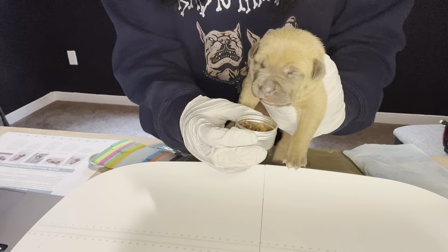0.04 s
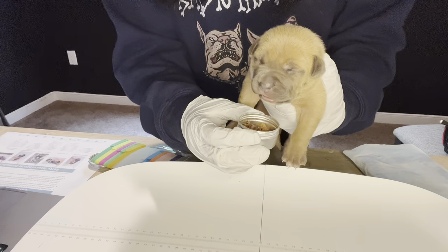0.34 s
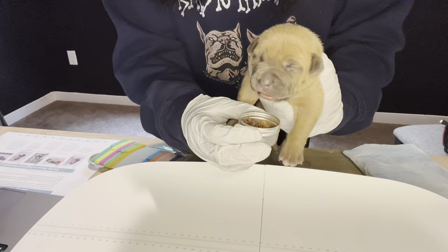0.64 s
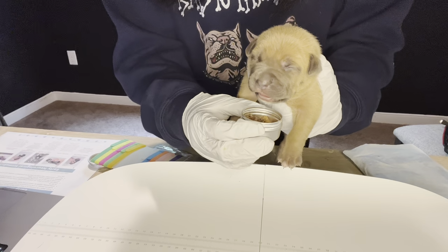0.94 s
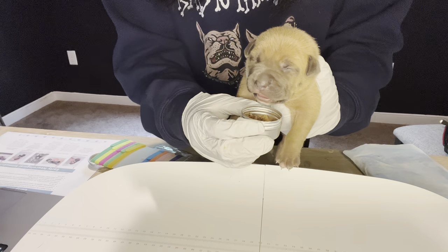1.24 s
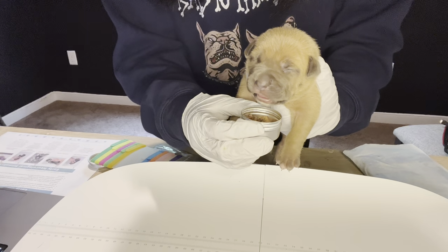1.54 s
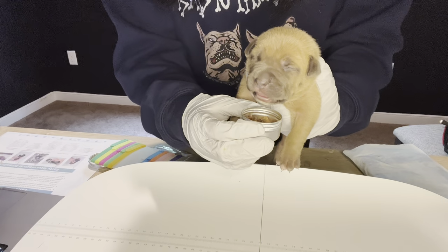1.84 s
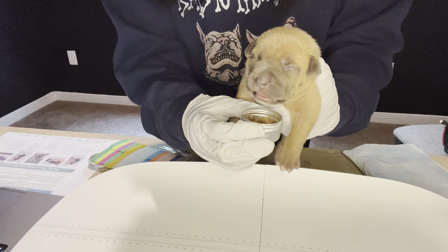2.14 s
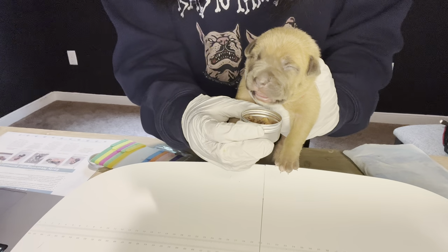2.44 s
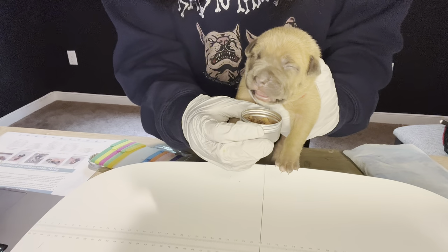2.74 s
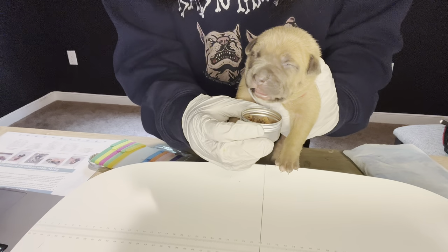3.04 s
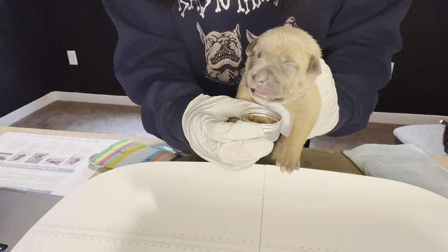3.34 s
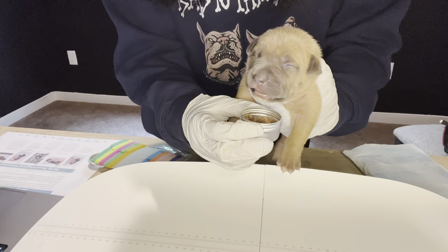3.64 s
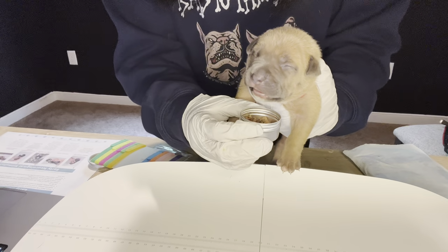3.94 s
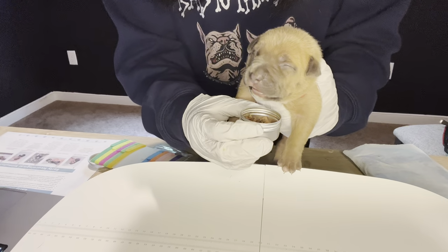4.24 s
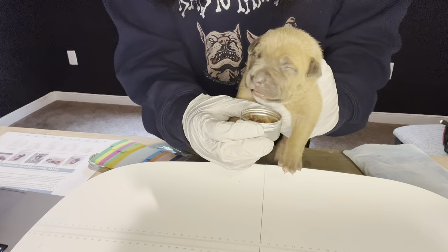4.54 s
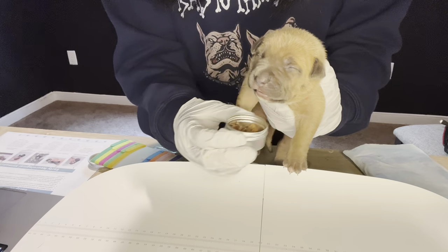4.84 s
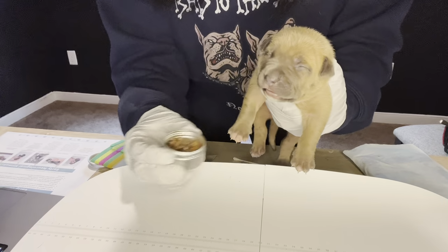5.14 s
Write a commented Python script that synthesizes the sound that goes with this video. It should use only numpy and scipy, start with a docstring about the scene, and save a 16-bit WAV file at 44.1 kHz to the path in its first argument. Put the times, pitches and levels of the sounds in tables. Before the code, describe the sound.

A very young puppy cries over and over in short bursts, its thin, high squeals breaking into rasps, hoarse falling whines and low grunts. From a little before halfway, hands and paws softly bump and scuff a hollow tub. Sleeves and gloves rustle faintly throughout. The small, slightly echoing room is heard in stereo, with the puppy a little to the right.

```python
"""A small live room, heard on a stereo microphone with hard surfaces near by. A very young puppy, held over a
tub a little to the right, cries over and over. Its vocal folds lock into thin squeals, then break down into
rasps, hoarse falling whines and low grunts, each coloured by throat and muzzle. A second pup grunts softly
beneath two of the squeals. Hands and paws bump and scuff the hollow tub, ringing its walls and its hollow.
Sleeves and gloves rustle throughout, over quiet room tone."""
import sys
import numpy as np
from scipy import signal
from scipy.fft import rfft, irfft
from scipy.io import wavfile
from scipy.ndimage import map_coordinates

SR = 44100
rng = np.random.default_rng(int(sys.argv[2]) if len(sys.argv) > 2 else 0)


def dump(signal):
    """Clip the signal to [-1, 1] and save it as 16-bit WAV at the path in sys.argv[1]."""
    limited = np.clip(np.atleast_2d(signal).T, -1, 1)
    pcm = np.round(limited * 32767).astype(np.int16)
    wavfile.write(sys.argv[1], SR, pcm)


N = 228066

# Noise spectra of room tone, cloth, breath forced through the throat, slaps and scuffs: hz, density_db
ROOM_TONE_SPECTRUM = [(25, -18.5), (70, -0.5), (110, -11.5), (170, -8.5), (400, -1.5), (1300, -1.5),
                      (2500, -13), (5000, -21.5), (9000, -33), (14000, -37)]
CLOTH_SPECTRUM = [(25, -3.5), (70, 7), (105, 3), (150, 2), (210, -1), (300, 0.5), (600, -4.5), (1200, 3.5),
                  (2500, -22.5), (5000, -26.5), (9000, -37.5), (14000, -38)]
BREATH_SPECTRUM = [(200, -1), (450, 2.5), (800, 10.5), (1300, 11), (2100, 1.5), (3600, -28), (4500, -49.5),
                   (6500, -7), (8500, -26), (10000, -8), (12500, -15), (15000, -38)]
SLAP_SPECTRUM = [(60, -2), (250, 3.5), (600, 4.5), (1200, -13), (2500, -20), (4500, -21.5), (8000, -31.5),
                 (14000, -33)]
SCUFF_SPECTRUM = [(80, -6), (300, -6), (550, 6.5), (1100, 4), (2000, -8), (3200, -11), (4500, -13),
                  (7000, -18.5), (9500, -20), (13000, -21), (15500, -55)]
# Cloth rubbing as the hands shift: time_s, level_db
CLOTH_LEVELS = [(0, -55.5), (.45, -62.5), (1, -60), (1.45, -61.5), (1.8, -69), (2.15, -49), (2.55, -55),
                (3, -54), (3.4, -52.5), (3.7, -53.5), (4, -51.5), (4.5, -50.5), (4.85, -52.5),
                (5.17, -54.5)]

# In the cries, level_db is the fundamental; second_db (second harmonic) and over_db (all above it) are
# relative to it. A share is a fraction of the cry's length. Roughness runs from 0, clean, to 1, hoarse.
# Thin high cries: start_s, length_s, crest_share, start_hz, crest_hz, end_hz, widest_share, open_s,
# level_db, swell_db, second_db, over_db, onset_roughness
SQUEALS = [ (0.009, 0.045, 0.1, 1530, 1530, 1520, 0.1, 0.2, -47, -14, -8, -8, 0.02),
           (0.084, 0.075, 0.74, 1425, 1526, 1450, 0.3, 0.085, -38.5, 6, -19.5, -30, 0.43),
           (0.498, 0.147, 0.63, 1225, 1530, 1495, 0.68, 0.072, -29.7, 3, -8.5, -8, 0.15),
           (0.736, 0.052, 0.25, 1510, 1530, 1480, 0.1, 0.08, -28, -3, -29, -39, 0.1),
           (2.254, 0.18, 0.522, 1486, 1662, 1564, 0.43, 0.13, -23.8, 0, -4, -7, 0.15),
           (2.604, 0.262, 0.52, 1180, 1640, 1510, 0.18, 0.085, -23.3, 9, -2, -0.5, 0.65), ]
NASAL_SQUEALS = [ (1.872, 0.145, 0.5, 1450, 1600, 1530, 0.4, 0.085, -30.3, -7, -22, -19, 0.25),
                 (3.455, 0.062, 0.9, 1280, 1430, 1420, 0.7, 0.08, -40, 3, -15, -11, 0.45),
                 (4.843, 0.075, 0.92, 1230, 1440, 1430, 0.7, 0.08, -34, 4, -17, -15, 0.2), ]  # muzzle nearly shut
# Creaky onsets at half pitch: start_s, length_s, start_hz, end_hz, overtone_level_db
CREAKS = [(0.082, 0.062, 641, 761, -46), (0.486, 0.05, 691, 679, -46), (1.056, 0.041, 617, 690, -43),
          (1.09, 0.035, 765, 780, -35.5), (2.593, 0.021, 676, 686, -39), (3.435, 0.054, 634, 640.4, -43.5),
          (4.837, 0.057, 675, 722, -48.5)]
# Low grunts, mostly rising; those at 2.269 s and 2.721 s come from a second pup: start_s, length_s, start_hz,
# end_hz, bow_hz, level_db, second_db, over_db, roughness
GRUNTS = [ (0.14, 0.075, 290, 500, 0, -42.5, 0, 0, 0.3), (0.651, 0.075, 501.6, 898, 0, -41, 0, -6.5, 0.8),
          (0.715, 0.1, 330, 458.8, 0, -43, 6, 3, 0.45), (1.174, 0.11, 759, 691.3, 0, -39, 0.5, -1.5, 0.37),
          (1.301, 0.125, 530, 590, 35, -54, 12.5, 8.5, 0.28),
          (2.269, 0.13, 310, 540, -35, -50, 4, -3, 0.62), (2.721, 0.1, 400, 542, 0, -49, 6, -9, 0.66),
          (3.045, 0.07, 270, 350, 0, -52, -3, 7, 0.6), (3.104, 0.17, 500, 515, 12, -44.5, -2, -0.5, 0.2),
          (3.826, 0.102, 445, 462, 32, -41.5, 5.5, -4.5, 0.28), ]
# Hoarse cries that crest and break downwards: start_s, length_s, crest_share, start_hz, crest_hz, end_hz,
# plunge (1 is an even fall, more is sudden), push_share, level_db, swell_db, second_db, over_db,
# start_roughness, end_roughness
WHINES = [ (0.169, 0.13, 0.031, 1403, 1390, 769.5, 1.75, 0.71, -36.3, 9, -1.5, -18.5, 0.7, 0.36),
          (1.5, 0.12, 0.39, 1110, 1098, 828, 1.37, 0.82, -34.5, 5, -5, -18.5, 0.55, 0.1),
          (2.024, 0.037, 0.95, 1020, 1149, 1160, 1.1, 0.47, -36.5, 1, -21, -29, 0.4, 0.1),
          (2.221, 0.053, 0.9, 1125, 1195, 1205, 1.1, 0.65, -43, 6, 8.5, -15, 1.05, 0.8),
          (2.842, 0.034, 0.2, 1140, 1145, 1125, 1.1, 0.44, -35.5, 3, -11, -30, 0.17, 0.25),
          (3.025, 0.14, 0.15, 1250, 1268, 749, 0.89, 0.98, -37, 8, -9, -16, 1, 0.3),
          (3.505, 0.072, 0.08, 1290, 1270, 820, 1.2, 0.82, -32, 8, 4, -23, 0.55, 0.27),
          (3.601, 0.043, 0.2, 890, 888, 865, 1.2, 0.74, -36.5, 7, 2, -31, 0.66, 0.72),
          (4.135, 0.092, 0.6, 860, 1340, 1200, 1.03, 0.55, -30.5, 8, -1, -24, 0.4, 0.95),
          (4.906, 0.078, 0.03, 1190, 1170, 840, 2.2, 0.45, -28.8, 4, -2, -18, 0.3, 0.38), ]
SPLIT_SQUEAL = (1.098, 0.08, 0.2, 772, 766, 748, 1, 0.68, -45.5, 7, 29, 15.5, 0.24, 0.11)  # strong and weak pulses alternate, adding lines between harmonics
WHIMPER = (1.688, 0.245, 0.42, 719, 745.5, 695.5, 1, 0.6, -39, 5.5, 11, -1, 0.16, 0.04)  # soft and nasal
YELP = (4.222, 0.04, 0.2, 1190, 1180, 1075, 1.1, 0.42, -19.7, 11, 1, -15, 0.2, 0.34)  # a short sharp bark
# Breaks in the voice: start_s, length_s, level_db, resonance_hz, width_hz
RASPS = [(0.632, 0.055, -36, 2040, 330), (1.156, 0.047, -30, 2330, 850), (2.392, 0.033, -36, 2360, 380),
         (2.594, 0.037, -40, 1700, 1300), (3.549, 0.026, -37, 1810, 450), (3.787, 0.055, -43, 1140, 190),
         (4.156, 0.05, -39, 1700, 600), (4.239, 0.009, -27, 2020, 300), (4.904, 0.03, -38, 2200, 450)]
# The throat's colour in each register, from the third harmonic up: hz, gain_db
SQUEAL_THROAT = [(3700, 10), (4500, 6.5), (5100, 3.5), (6200, -0.5), (7200, -8), (7950, -3.5), (8500, -16),
                 (9400, -22), (10200, -20.5), (11500, -17.5), (13300, -26), (14500, -46)]
GRUNT_THROAT = [(900, 23), (1500, 5.5), (2100, 5.5), (2700, -19), (4000, -23), (6500, -14.5), (9000, -50),
                (11000, -24), (14000, -46)]
WHINE_THROAT = [(1200, -3), (2200, 9.5), (2900, -9.5), (3500, -10.5), (4400, -25), (5400, -17),
                (7000, -13.5), (8500, -40), (11000, -25), (14000, -55)]
SPLIT_THROAT = [(2300, -11), (3050, 0), (3800, -26), (4550, -14), (5350, -21), (6050, -15), (6900, -20),
                (7600, -22), (8500, -42), (10500, -31), (13500, -34), (15000, -60)]
WHIMPER_THROAT = [(2100, 9.5), (2900, -9), (3700, -19), (4800, -28), (6300, -8), (7300, -15.5),
                  (8500, -30.5), (10400, -9), (11500, -32), (13000, -32), (15000, -41)]
NASAL_THROAT = [(4200, -13), (4800, -19), (5600, -11), (6400, 0), (7100, 2), (8000, -14), (9000, -22),
                (10500, -10), (13000, -24), (15000, -42)]
YELP_THROAT = [(3200, 0), (3800, -1), (4500, 7), (5050, -3), (5500, 0), (6600, -16), (7900, -13),
               (9000, -31), (10800, -16), (13000, -35)]
# Side cavities of the muzzle: centre_hz, width_hz, gain_db
MUZZLE_BANDS = [(3470, 350, -4.5), (5430, 133, 3.5)]

# Blows on the tub: start_s, level_db, relative_boom_db, relative_slap_db, t60_factor, spot_hz, press_s
BUMPS = [(1.795, -39, -14, -5, 1.6, 200, .005), (1.965, -42, -5, -20, 1.4, 170, .008),
         (2.036, -42, -21, -23, 0.86, 190, .007), (2.103, -36, -17, -20, 1.4, 200, .008),
         (2.421, -24.5, -8, -22, 1, 155, .008), (3.248, -44, -12, -14, 1, 135, .012),
         (3.279, -28.5, 3, -8, 1.35, 160, .006), (3.63, -38, -4, -7, 1.04, 180, .01),
         (3.661, -46, -1.5, 10, 0.6, 400, .005), (4.284, -37, -14, -28, 0.98, 200, .01),
         (4.422, -39, -3, -6, 1.4, 175, .008), (4.564, -32, -11, -0.5, 1.37, 185, .012),
         (4.749, -23, -22, -12, 0.8, 235, .008), (5.092, -25, -26, -8, 1, 205, .015)]
# Modes of the tub's walls: pitch_hz, level_db, t60_s
TUB_MODES = [(149, -2, 0.33), (182, 0, 0.22), (208, -1, 0.24), (287, 0, 0.21), (443, -6, 0.35),
             (511, -5, 0.15), (623, -16, 0.45)]
# Scuffs of glove and paw: start_s, length_s, level_db
SCUFFS = [(3.281, 0.012, -41.5), (3.66, 0.1, -53), (3.724, 0.023, -47), (4.548, 0.011, -29.5),
          (4.552, 0.051, -32.5), (5.006, 0.02, -47)]

# Echoes off the table, the chest and the nearest walls: left_delay_s, right_delay_s, level_db
ECHOES = [(.0021, .0017, -8), (.0047, .0052, -8), (.0083, .0076, -8), (.0118, .0126, -8),
          (.0172, .0163, -9), (.0231, .0243, -10), (.0316, .0302, -12)]
# Decay of the room: hz, t60_s
ROOM_T60 = [(100, 0.21), (500, 0.34), (1500, 0.4), (4500, 0.46), (8000, 0.42), (14000, 0.19)]
# What the surfaces throw back: hz, gain_db
REFLECTED_COLOUR = [(50, -12), (110, -3), (300, -1), (1500, -0.5), (5000, 0), (8000, -2.5), (14000, 2)]
# The voice at the microphone: hz, left_minus_right_db
VOICE_BALANCE = [(400, -2.5), (900, -3.5), (2000, -0.5), (3200, -3), (4500, -4.5), (6500, -3.5),
                 (8500, -1.5), (12000, 2)]


def amp(db):
    return 10 ** (np.asarray(db) / 20)


def unit_rms(x):
    return x / np.sqrt(np.mean(abs(x) ** 2) + 1e-20)


def curve_at(points, hz):
    """A spectrum joined by straight lines on a log-frequency axis."""
    f, value = np.transpose(points)
    return np.interp(np.log(hz + 1), np.log(f + 1), value)


def add(mix, start_s, sound):
    part = mix[round(start_s * SR):][:len(sound)]
    part += sound[:len(part)]


def noise(spectrum, size=N):
    """Coloured noise of rms about 1."""
    colour = amp(curve_at(spectrum, np.fft.rfftfreq(N, 1 / SR)))
    return unit_rms(irfft(rfft(rng.standard_normal(N)) * colour, N))[:size]


def flutter(t, rate):
    """A smooth random wobble with about rate turns a second."""
    return map_coordinates(rng.standard_normal(2048), [(t - t[0]) * rate], order=2, mode="wrap")


def room_tone():
    """Quiet air, partly shared by the two sides of the microphone."""
    shared = noise(ROOM_TONE_SPECTRUM)
    pair = np.array([shared + 1.25 * noise(ROOM_TONE_SPECTRUM) for side in range(2)])
    return amp(-60) * unit_rms(pair)


def rustle():
    """Sleeves and gloves rub, dull and lumpy."""
    t = np.arange(N) / SR
    level_db = np.interp(t, *np.transpose(CLOTH_LEVELS)) + 0.83 * flutter(t, 25)
    return amp(level_db) * noise(CLOTH_SPECTRUM)


def cry(gesture, throat, waver, jitter, rasp, rasp_rate, hiss_db, harmonics):
    """Vocal folds and breath follow a gesture; roughness shakes the pitch and smears each harmonic."""
    times, *columns = np.transpose(gesture)
    fade_s = .008
    t = np.arange(times[0] - fade_s, times[-1] + fade_s, 1 / SR)
    hz, level_db, second_db, over_db, rough = (np.interp(t, times, c) for c in columns)
    hz = hz * (1 + waver * flutter(t, 60.07))  # never held quite steady
    rough = np.clip(rough, 0, 1)
    quiver = flutter(t, 260.3) + 0.67 * np.sin(2 * np.pi * (95 * t + 0.072 * flutter(t, 42.6)))  # strain
    phase = 2 * np.pi * np.cumsum(hz * (1 + jitter * np.tanh(rough / 0.42) * quiver)) / SR
    overtone_hz = np.arange(3, harmonics + 1)[:, None] * hz
    overtones = amp(curve_at(throat, overtone_hz)) * (overtone_hz < SR / 2)
    overtones *= amp(over_db) / np.linalg.norm(overtones, axis=0)
    heights = np.vstack([np.ones(len(t)), amp(second_db), overtones])
    voice = np.zeros(len(t))
    for order, height in enumerate(heights, 1):
        smear = np.clip(rasp * rough * order ** .33, 0, 1)  # high harmonics lose their shape first
        hoarse = (flutter(t, rasp_rate) + 1j * flutter(t, rasp_rate)) / np.sqrt(2)
        voice += height * ((np.sqrt(1 - smear ** 2) + smear * hoarse) * np.exp(1j * order * phase)).real
    effort_db = level_db + 10 * np.log10(np.sum(heights ** 2, axis=0))
    hiss = amp(hiss_db + 0.68 * effort_db) * noise(BREATH_SPECTRUM, len(t))  # grows less than the tone
    hiss *= 1 - np.exp(-(t - t[0]) / 0.026)  # the airflow builds up
    ends = np.clip(np.minimum(t - t[0], t[-1] - t) / fade_s, 0, 1)
    return t[0], ends * (np.sqrt(2) * amp(level_db) * voice + hiss)


def pitch_arch(u, crest, start_hz, crest_hz, end_hz, plunge):
    """Pitch eases to its crest, then slides to its end; u runs from 0 to 1 over the cry."""
    before = np.clip(1 - u / crest, 0, 1)
    after = np.clip((1 - u) / (1 - crest), 0, 1)
    return crest_hz + (start_hz - crest_hz) * before ** 2 + (end_hz - crest_hz) * (1 - after ** plunge)


def squeal(start_s, length_s, crest, start_hz, crest_hz, end_hz, widest, open_s,
           level_db, swell_db, second_db, over_db, onset_rough):
    """A scratchy onset locks into an arching tone, shrill with the mouth open and pure once it shuts."""
    u = np.linspace(0, 1)
    t = u * length_s
    hz = pitch_arch(u, crest, start_hz, crest_hz, end_hz, plunge=0.99)
    attack = np.clip(1 - t / 0.032, 0, 1)
    release = np.clip(1 - (length_s - t) / 0.022, 0, 1)
    envelope_db = level_db + swell_db * (u - .5) - 15 * attack - 9.5 * release
    shut = 1 - np.exp(-((t - widest * length_s) / open_s) ** 2)
    rough = 0.069 + onset_rough * np.exp(-t / 0.049)  # the folds settle
    return np.column_stack([start_s + t, hz, envelope_db,
                            second_db - 32 * shut, over_db - 33.5 * shut, rough])


def creak(start_s, length_s, start_hz, end_hz, overtone_level_db):
    """The folds start at half speed, and mostly their third harmonic gets through the throat."""
    return grunt(start_s, length_s, start_hz, end_hz, bow_hz=0,
                 level_db=overtone_level_db - 12, second_db=0, over_db=12, rough=0.29)


def grunt(start_s, length_s, start_hz, end_hz, bow_hz, level_db, second_db, over_db, rough):
    """Slack folds: the pitch slides in a shallow bow under one late push, with a steady colour."""
    u = np.linspace(0, 1)
    hz = start_hz + (end_hz - start_hz) * u + bow_hz * np.sin(np.pi * u)
    push_db = np.interp(u, [0, 0.73, 1], [-7, 0, -3.5])
    columns = start_s + u * length_s, hz, level_db + push_db, second_db, over_db, rough
    return np.column_stack(np.broadcast_arrays(*columns))


def whine(start_s, length_s, crest, start_hz, crest_hz, end_hz, plunge, hardest,
          level_db, swell_db, second_db, over_db, start_rough, end_rough):
    """One push of the chest opens the mouth; the pitch breaks and slides through the throat's ring."""
    ring_hz, ring_width_hz = 1920, 420  # the second harmonic flares in this resonance
    u = np.linspace(0, 1)
    t = u * length_s
    hz = pitch_arch(u, crest, start_hz, crest_hz, end_hz, plunge)
    off_ring = 1 - np.exp(-((2 * hz - ring_hz) / ring_width_hz) ** 2)
    shut = 1 - np.exp(-((t - hardest * length_s) / 0.033) ** 2)
    attack_db = -6 * np.clip(1 - t / 0.011, 0, 1)
    push_db = np.interp(u, [0, hardest, 1], [-swell_db, 0, -9])
    rough = start_rough + (end_rough - start_rough) * u
    return np.column_stack([start_s + t, hz, level_db + attack_db + push_db,
                            second_db - 20 * off_ring, over_db - 0.92 * swell_db * shut, rough])


def voice_break(length_s, level_db, resonance_hz, width_hz):
    """The folds flap out of order: uneven slaps ring a broad throat resonance and a weaker high one."""
    slaps_per_s, attack_s, release_s = 750, 0.004, 0.012
    t = np.arange(0, length_s + 5 * release_s, 1 / SR)
    turns = np.cumsum(slaps_per_s * np.exp(.5 * flutter(t, slaps_per_s))) / SR
    slaps = np.diff(np.floor(turns), prepend=0) * amp(2 * flutter(t, slaps_per_s))
    hz = np.fft.rfftfreq(len(t), 1 / SR)
    throat = 1 / (1 + 1j * (hz - resonance_hz) / width_hz) ** 4
    treble = amp(-24) / (1 + 1j * (hz - 6300) / 1450) ** 4
    rasp = unit_rms(irfft(rfft(slaps) * (throat + treble), len(t)))
    effort = np.minimum(t / attack_s, 1) * np.exp(-np.maximum(t - length_s, 0) / release_s)
    return amp(level_db - 4 * t / length_s) * effort * rasp


def muzzle(voice):
    """The side cavities of the muzzle swallow one narrow band and lift another."""
    hz = np.fft.rfftfreq(N, 1 / SR)
    gain_db = sum(db * np.exp(-(2 * (hz - centre) / width) ** 2) for centre, width, db in MUZZLE_BANDS)
    return irfft(rfft(voice) * amp(gain_db), N)


def puppy():
    """Each register of the voice has its own gesture, throat shape and hoarseness."""
    out = np.zeros(N)
    for row in SQUEALS:
        add(out, *cry(squeal(*row), SQUEAL_THROAT,
                      waver=.006, jitter=.033, rasp=.46, rasp_rate=650, hiss_db=-32.5, harmonics=9))
    for row in WHINES:
        add(out, *cry(whine(*row), WHINE_THROAT,
                      waver=.015, jitter=.03, rasp=1.1, rasp_rate=500, hiss_db=-25.5, harmonics=17))
    for row in CREAKS:
        add(out, *cry(creak(*row), WHINE_THROAT,
                      waver=.008, jitter=.015, rasp=.7, rasp_rate=500, hiss_db=-36, harmonics=5))
    for row in GRUNTS:
        add(out, *cry(grunt(*row), GRUNT_THROAT,
                      waver=.012, jitter=.022, rasp=1.15, rasp_rate=400, hiss_db=-26.5, harmonics=26))
    for start_s, *row in RASPS:
        add(out, start_s, voice_break(*row))
    add(out, *cry(whine(*WHIMPER), WHIMPER_THROAT,
                  waver=.018, jitter=.03, rasp=1.5, rasp_rate=350, hiss_db=-28, harmonics=19))
    for row in NASAL_SQUEALS:
        add(out, *cry(squeal(*row), NASAL_THROAT,
                      waver=.005, jitter=.025, rasp=.42, rasp_rate=500, hiss_db=-35, harmonics=9))
    add(out, *cry(whine(*SPLIT_SQUEAL), SPLIT_THROAT,
                  waver=.005, jitter=.03, rasp=.5, rasp_rate=500, hiss_db=-32, harmonics=19))
    add(out, *cry(whine(*YELP), YELP_THROAT,
                  waver=.008, jitter=.025, rasp=.9, rasp_rate=600, hiss_db=-31, harmonics=12))
    return muzzle(out)


def tub():
    """Soft blows ring the deep hollow of the tub, and the wall modes nearest the struck spot's note."""
    boom_hz, boom_rise_s, boom_t60_s = 66.6, 0.016, 0.34
    out, t = np.zeros(N), np.arange(SR // 2) / SR
    for start_s, level_db, boom_db, _, t60_factor, spot_hz, press_s in BUMPS:
        detunes = 1 + 0.013 * rng.standard_normal(len(TUB_MODES))
        walls = np.zeros(len(t))
        for (hz, mode_db, t60_s), detune in zip(TUB_MODES, detunes):
            off_spot_db = -11 * abs(np.log2(hz / spot_hz))
            decay = amp(mode_db + off_spot_db - 60 * t / (t60_s * t60_factor))
            walls += decay * np.sin(2 * np.pi * hz * detune * t + rng.uniform(0, np.pi))
        boom_envelope = 2 * amp(boom_db - 60 * t / boom_t60_s) * (1 - np.exp(-t / boom_rise_s))
        boom = boom_envelope * np.sin(2 * np.pi * boom_hz * t)
        press = 1 - np.exp(-(t / press_s) ** 2)
        add(out, start_s, amp(level_db) * press * (walls + boom))
    return out


def handling():
    """Hands and paws on the tub: the soft slap of each bump, and short grainy scuffs."""
    out, t = np.zeros(N), np.arange(SR // 4) / SR
    for start_s, level_db, _, slap_db, _, _, press_s in BUMPS:
        slap = amp(level_db + slap_db - 60 * t / 0.21) * (1 - np.exp(-t / press_s))
        add(out, start_s, slap * noise(SLAP_SPECTRUM, len(t)))
    for start_s, length_s, level_db in SCUFFS:
        stroke = (1 - np.exp(-t / .006)) * np.exp(-np.maximum(t - length_s, 0) / 0.013)
        grain_db = 3.8 * flutter(t, 338.5)
        add(out, start_s, amp(level_db + grain_db) * stroke * noise(SCUFF_SPECTRUM, len(t)))
    return out


def room(source, wet_db, echo_db, left_db):
    """Direct sound reaches the microphone's right side first; near surfaces, then the walls, answer."""
    size = 30000
    taps = rng.choice([-1., 1.], (2, size)) * (rng.random((2, size)) < .08)
    taps[:, :SR // 150] = 0  # the gap before the tail arrives
    hz, t, spectra = signal.stft(taps, SR, nperseg=256)
    decay = amp(-60 * t / curve_at(ROOM_T60, hz)[:, None])
    tail = signal.istft(spectra * decay, SR, nperseg=256)[1][:, :size]
    response = amp(wet_db) * tail / np.linalg.norm(tail, axis=1, keepdims=True)
    for left_s, right_s, level_db in ECHOES:
        response[[0, 1], [round(left_s * SR), round(right_s * SR)]] += amp(level_db + echo_db)
    total_gain = np.sqrt(1 + np.sum(response[0] ** 2))
    colour = amp(curve_at(REFLECTED_COLOUR, np.fft.rfftfreq(size, 1 / SR)))
    response = irfft(rfft(response) * colour, size)
    response[[0, 1], [20, 0]] += 1  # direct path, 20 samples later on the left
    pair = signal.fftconvolve(source[None], response, axes=1)[:, :N]
    return pair / total_gain * amp([[left_db], [-left_db]])


def voice_direction(pair):
    """The voice favours the microphone's right side in all but the highest treble."""
    tilt_db = curve_at(VOICE_BALANCE, np.fft.rfftfreq(N, 1 / SR)) / 2
    return irfft(rfft(pair) * amp([tilt_db, -tilt_db]), N)


def scene():
    """One microphone position: the voice carries the most room, the ring of the tub the least."""
    voice = amp(0.58) * voice_direction(room(puppy(), wet_db=-1.5, echo_db=-3.0, left_db=-0.5))
    touch = room(handling() + rustle(), wet_db=-4.0, echo_db=-11.0, left_db=-1.23)
    bumps = room(tub(), wet_db=-13, echo_db=-12, left_db=-.6)
    return voice + touch + bumps + room_tone()


def record(dry):
    """The microphone's low cut and the recorder's band limit."""
    low_cut = signal.butter(3, 40, "highpass", fs=SR, output="sos")
    band_limit = signal.firwin(511, 15000, window=("kaiser", 9), fs=SR)
    return signal.oaconvolve(signal.sosfilt(low_cut, dry), band_limit[None], "same")


dry = scene()
out = record(dry)
dump(out)
```